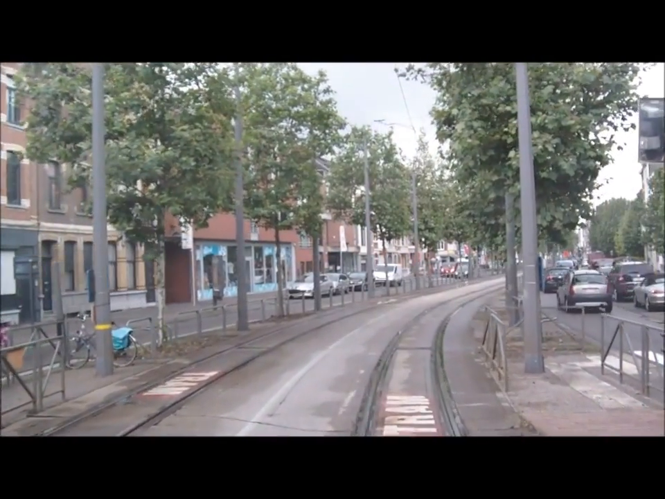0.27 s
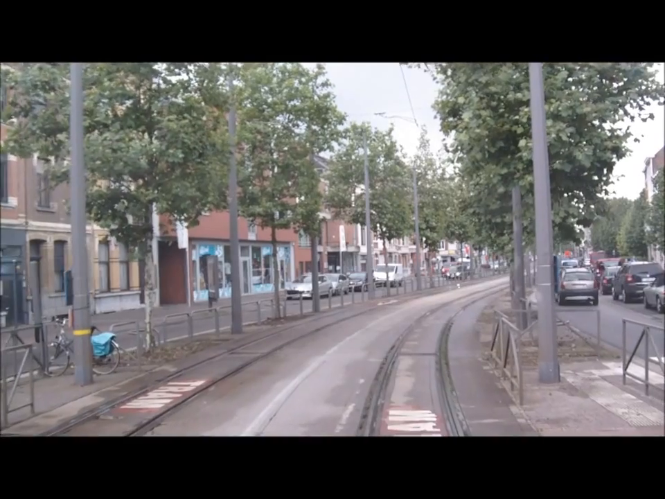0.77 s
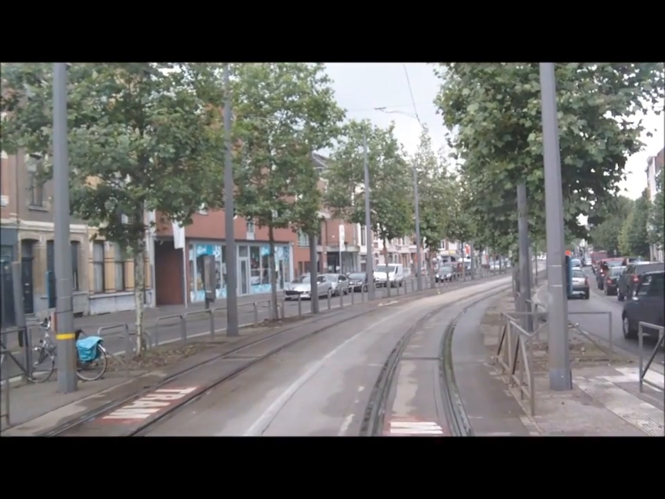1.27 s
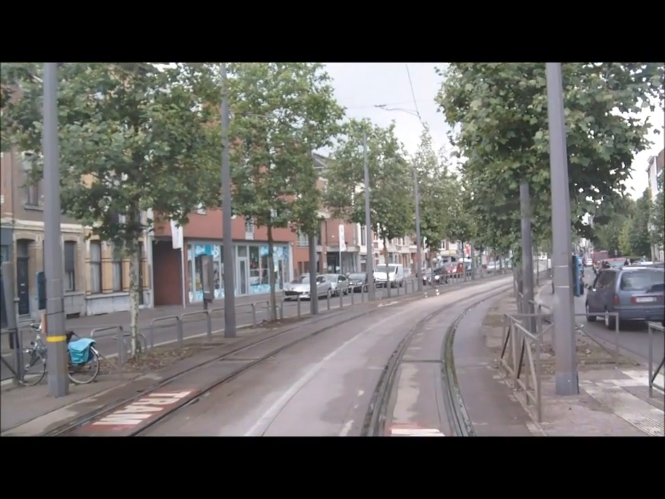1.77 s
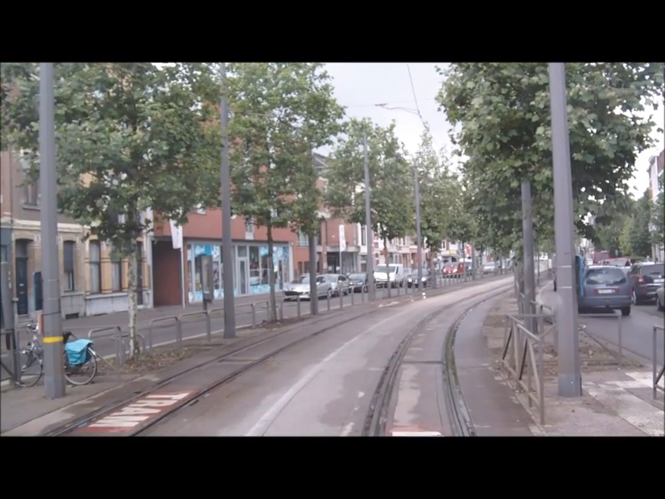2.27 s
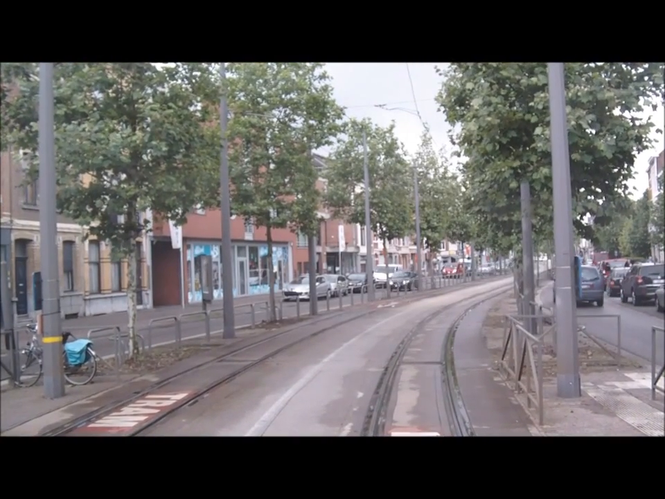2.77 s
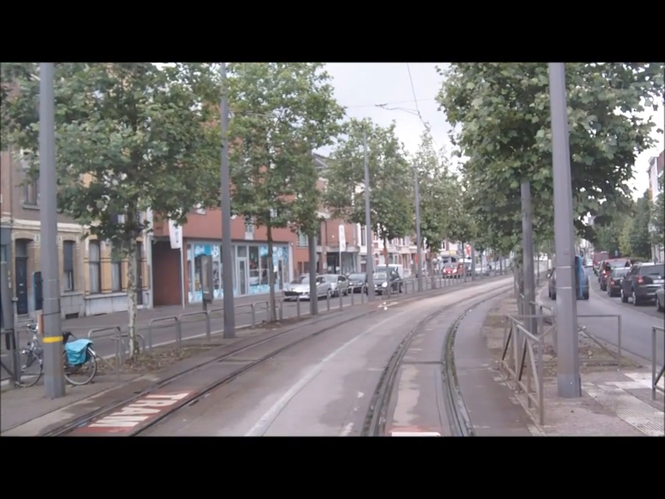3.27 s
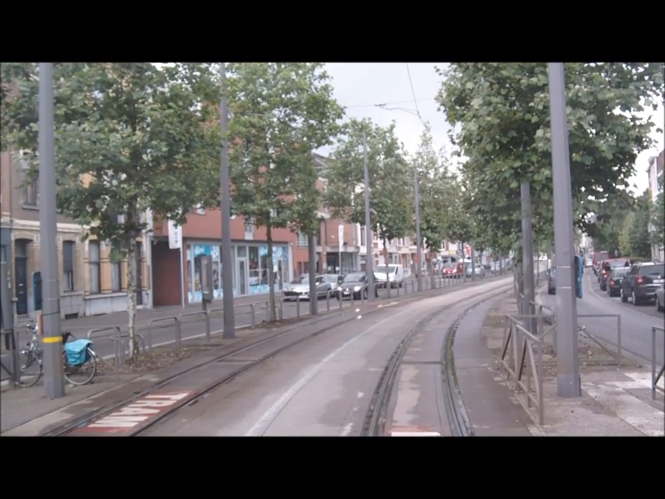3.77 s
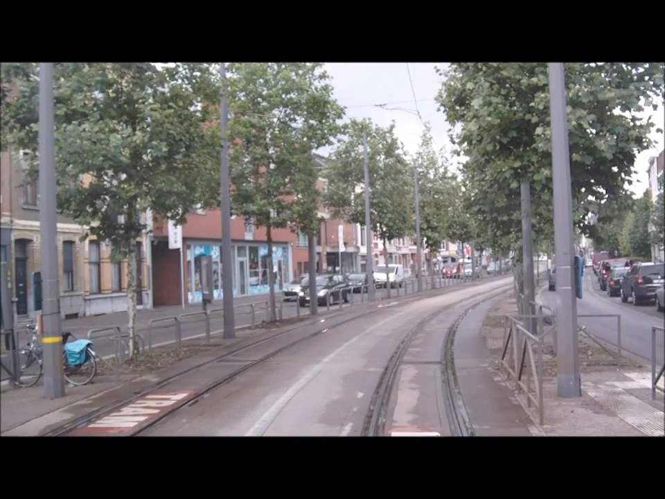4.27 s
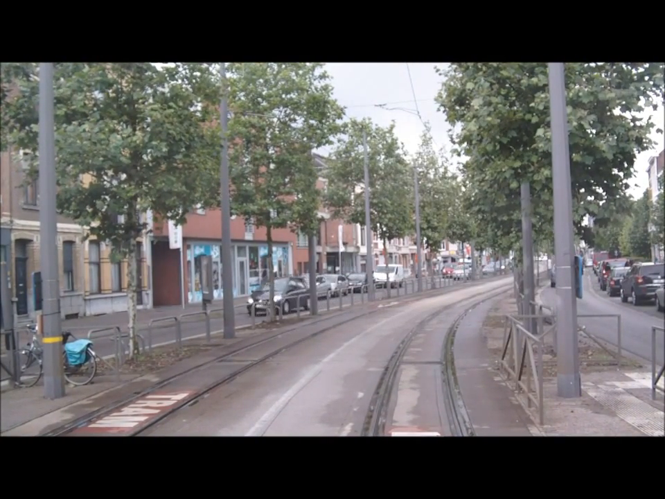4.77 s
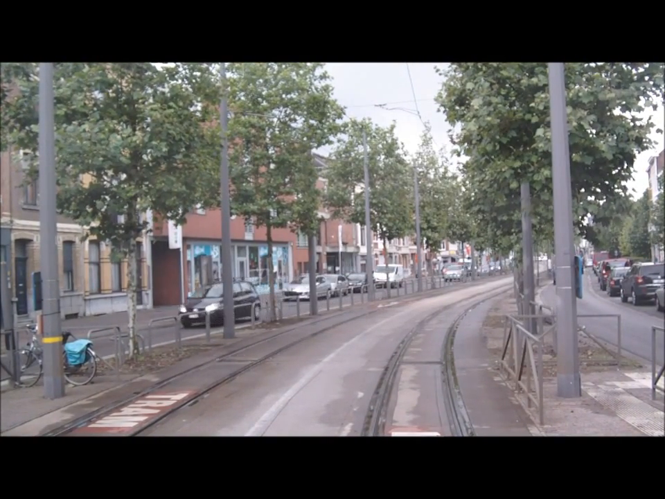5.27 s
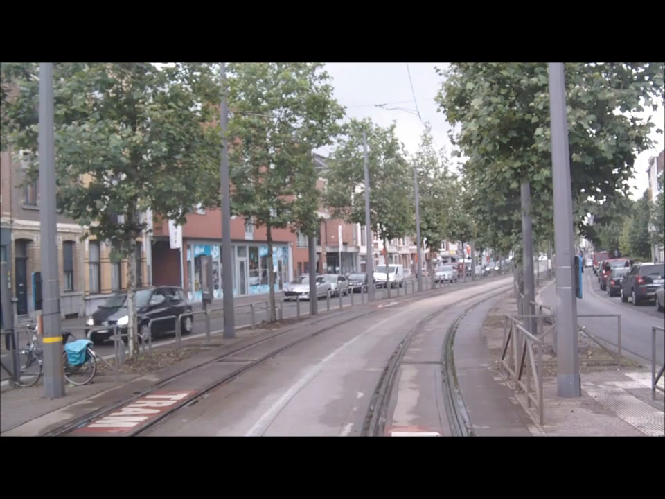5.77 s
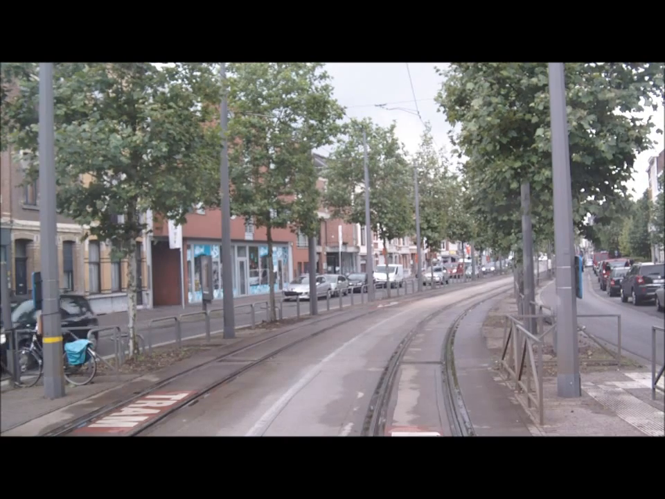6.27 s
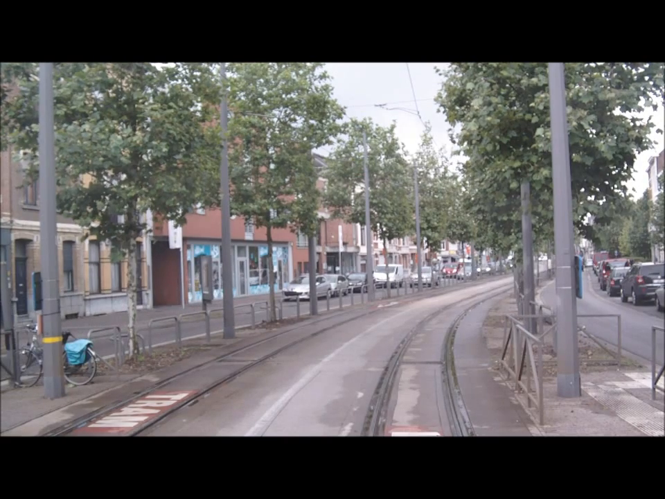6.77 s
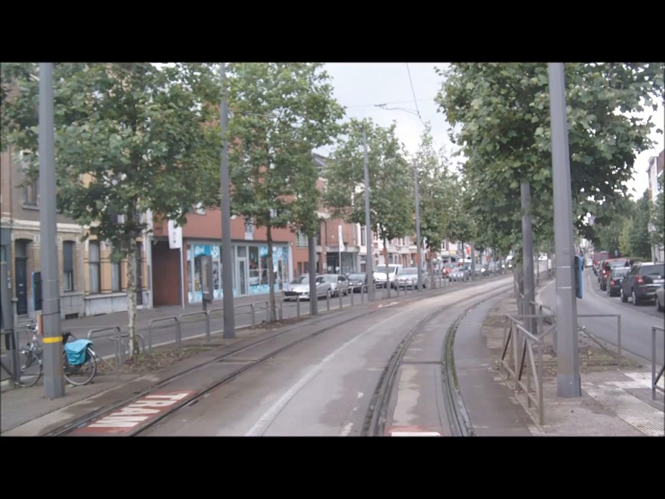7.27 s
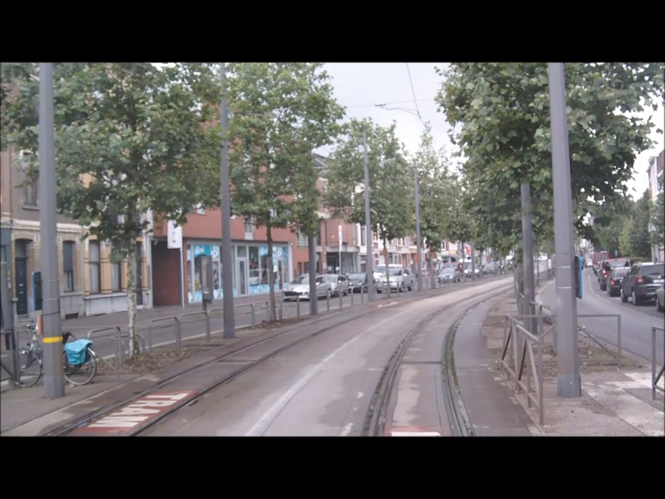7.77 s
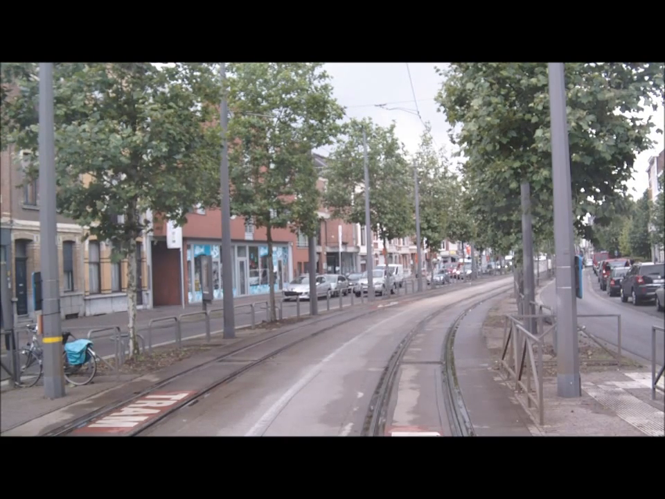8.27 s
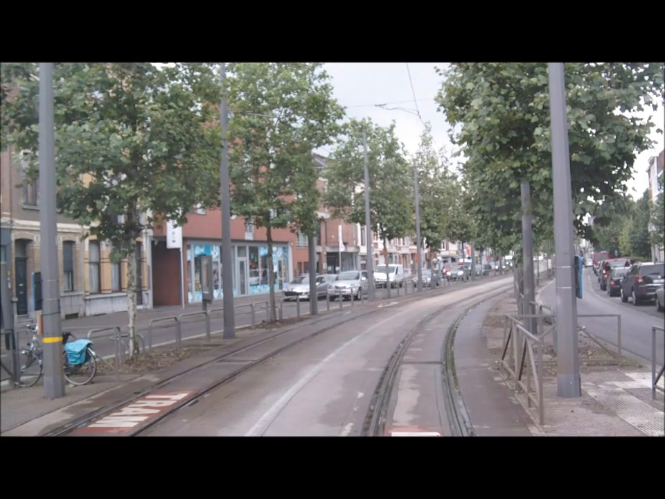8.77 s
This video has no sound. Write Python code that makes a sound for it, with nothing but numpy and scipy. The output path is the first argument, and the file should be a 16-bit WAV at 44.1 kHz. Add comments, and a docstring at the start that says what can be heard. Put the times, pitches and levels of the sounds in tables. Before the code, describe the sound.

Inside a tram cab, a motor whine sinks with a faint fluttering squeak, the body lurches and clacks, then low rumble and soft rustles remain.

```python
"""A braking tram, heard in the cab

The drive whines down beside a fluttering squeak, then the body lurches, levers clack and thin metal pings.
Whine, squeak, pings and hum are wavering sine tones; blows are quick taps that make the cab ring.
Rustles close by are short bursts of hiss. Body rumble, street, fans and wheel drone are coloured noise.
"""
import sys
import numpy as np
from scipy import signal
from scipy.fft import rfft, irfft, next_fast_len
from scipy.io import wavfile
from scipy.ndimage import uniform_filter1d, map_coordinates

SR = 44100
rng = np.random.default_rng(int(sys.argv[2]) if len(sys.argv) > 2 else 0)


def wrap_up_sound(samples):
    """Save the sound to the file named by the first command line argument, as 16-bit audio."""
    columns = np.atleast_2d(samples).T
    # keep every value between -1 and 1, then stretch to whole-number steps
    tamed = np.clip(columns, -1, 1)
    steps = np.round(tamed * 32767).astype(np.int16)
    wavfile.write(sys.argv[1], SR, steps)


N = 397341
TIME = np.arange(N) / SR  # s, the whole scene
SHORT = np.arange(SR // 2) / SR  # s, the half second given to each short sound


def amp(db):
    """Turns dB into a gain."""
    return 10 ** (np.asarray(db) / 20)


def unit(x):
    """Scales a signal to an rms of 1."""
    return x / np.sqrt(np.mean(x ** 2) + 1e-20)


def along(points, hz):
    """Reads a curve of (f/Hz, value) points on a log frequency axis."""
    f, value = np.transpose(points)
    return np.interp(np.log(hz + 1), np.log(f + 1), value)


def curves(rows):
    """Draws each column after the time as a curve with one value per sample."""
    times, *columns = np.transpose(rows)
    return [np.interp(TIME, times, column) for column in columns]


def wobble(rate):
    """A smooth random curve through `rate` random points a second."""
    points = rng.standard_normal(int(N * rate / SR) + 4)
    return map_coordinates(points, [np.arange(N) * rate / SR])


def wave(hz):
    """A sine whose pitch follows a curve: the phase is the running sum of the frequency."""
    return np.sin(2 * np.pi * np.cumsum(hz) / SR)


def filtered(x, response):
    """Multiplies the spectrum of x by a response of frequency."""
    m = next_fast_len(x.shape[-1] + 8192)
    spectrum = rfft(x, m) * response(np.fft.rfftfreq(m, 1 / SR))
    return irfft(spectrum, m)[..., :x.shape[-1]]


def rush(gain, patchy_db):
    """Two coloured noises, together of rms 1, whose patches in time and pitch have random gain."""
    grid = signal.stft(rng.standard_normal((2, N)), nperseg=512)[2]
    field = uniform_filter1d(rng.standard_normal(grid.shape[1:]), size=6, axis=0)
    field = uniform_filter1d(field, size=10, axis=1)
    pair = signal.istft(grid * amp(patchy_db * unit(field)), nperseg=512)[1][:, :N]
    return unit(filtered(pair, gain))


def swell(t, rise, hold, t60):
    """An outline that rises softly, holds, then falls by 60 dB every t60 seconds."""
    fall_time = np.clip(t - rise - hold, 0, None)
    return np.clip(t / rise, 0, 1) ** 2 * amp(-60 * fall_time / t60)


def add(total, start, sound):
    """Mixes a sound in at a start time in seconds."""
    part = total[:, round(start * SR):][:, :sound.shape[1]]
    part += sound[:, :part.shape[1]]


# the gear tone of the drive: first pitch, the pitch it sinks towards, time constant of sinking
WHINE_HZ, WHINE_END_HZ, SLOWING_S = 474, 286, 0.41
WHINE_DB, WHINE_FADE_DB_PER_S = -37.5, 7.5  # the level wavers around this fading line


def drive_whine():
    """The gear tone sinks with the speed, its pitch and level wavering."""
    hz = WHINE_END_HZ + (WHINE_HZ - WHINE_END_HZ) * np.exp(-TIME / SLOWING_S)
    db = WHINE_DB - WHINE_FADE_DB_PER_S * TIME + 1.8 * wobble(23)
    tone = amp(db) * wave(hz * (1 + 0.012 * wobble(32)))
    return swell(TIME, rise=.0012, hold=.546, t60=.14) * tone


SQUEAK_HZ, SQUEAK_DB = 1338, -51  # middle pitch and level
FLUTTERS_PER_S, FLUTTER_DB, FLUTTER_CREST_S = 12.1, 4.5, 0.062  # rate, depth, time of a crest


def wheel_squeak():
    """A squeak at the start flutters in level, with a band of raspy noise beside it."""
    flutter = np.cos(2 * np.pi * FLUTTERS_PER_S * (TIME - FLUTTER_CREST_S))
    db = SQUEAK_DB + FLUTTER_DB * flutter + 4.2 * wobble(60.4)
    squeak = amp(db) * wave(SQUEAK_HZ * (1 + 0.0215 * wobble(70)))
    rasp = amp(-59) * rush(lambda f: 1 / (1 + ((f - 2450) / 300) ** 2), patchy_db=3)
    return swell(TIME, rise=.001, hold=.4, t60=.66) * (squeak + rasp)


def lurch():
    """The brakes rock the body: a strong low tone that swells and soon dies away."""
    t = TIME - 2.191
    return amp(-9) * swell(t, rise=.028, hold=.025, t60=.05) * np.sin(2 * np.pi * 86 * t)


# what the cab's frame and panels ring with: f/Hz, level/dB (relative), time to fall 60 dB/s
CAB_MODES = [(41.6, -5, 0.25), (83.4, 6, 0.16), (112, 1.5, 0.37), (156.3, 3, 0.3), (213.7, -2, 0.72),
             (243.4, 0, 0.28), (344.6, -1.5, 0.33), (384, 2, 0.13), (422, 3, 0.16), (490.3, 1, 0.2),
             (637, -2, 0.18), (735, -2.5, 0.15), (830, -6.5, 0.11), (917, -5.5, 0.11), (1054, 3.5, 0.057),
             (1138, -14.5, 0.28), (1367, -5, 0.051), (1500, -5.5, 0.093), (1955, -5.5, 0.07),
             (2430, -9.5, 0.065), (3340, -8, 0.15), (3976, -2, 0.066), (4900, -9, 0.055), (5850, -5, 0.087),
             (6280, -3, 0.11)]
# blows: t/s, level/dB, f/Hz (centre of the push), spread/octaves,
# rattle/s (taps fall 60 dB in four times this), share of the power that rings (0-1)
BLOW_EVENTS = [(2.17, -23, 147, 0.74, 0.077, 0.65), (2.168, -34.5, 438, 0.21, .025, 0.8),
               (2.18, -29, 205, 0.3, .01, 1), (2.221, -34.5, 398, 0.85, 0.11, 0.82),
               (2.278, -21.5, 97, 0.45, 0.015, 0.7), (2.364, -21.5, 88, 0.28, 0.022, 0.7),
               (2.39, -37.5, 328, 0.55, 0.014, 0.9), (2.394, -21.5, 43.4, 0.25, 0.0063, .95),
               (2.623, -32.5, 744, 0.97, 0.06, 0.75), (2.622, -34, 5940, 0.22, 0.025, 0.34),
               (2.637, -26, 276, 0.32, 0.01, 0.55), (2.657, -22.5, 320, 0.53, 0.0066, 0.7),
               (2.68, -24.5, 148, 0.87, 0.013, 0.5), (2.879, -36, 1490, 0.59, 0.029, 0.7),
               (2.883, -32.5, 2390, .5, 0.013, .7), (2.877, -36, 4200, 0.68, 0.013, 0.4),
               (3.057, -16.5, 190, 0.9, 0.048, 0.64), (3.063, -22.5, 945, 0.46, 0.02, 0.72),
               (3.068, -34, 1930, 0.44, 0.015, 0.66), (3.088, -25.5, 365, 0.58, 0.021, .7),
               (3.112, -37, 1070, 0.25, 0.039, 1), (4.023, -45, 970, 0.39, 0.04, 0.8),
               (4.066, -41.5, 424, 0.32, 0.0099, 0.5), (5.272, -58, 3900, .15, .006, 0.7),
               (5.417, -49.5, 2640, 0.99, .01, 0.3), (5.904, -47, 1700, 0.78, 0.024, 0.68),
               (7.993, -31.5, 917, 0.83, 0.048, 0.64), (8.005, -31.5, 575, 0.26, 0.025, 0.46),
               (8.016, -40.5, 1790, 0.67, 0.043, 0.5)]
# average rate; level of the strong tap at the end of the rise, over the spread of the other taps
TAPS_PER_S, CREST_TAP_DB = 900, 8
SCATTER_T60_S = 0.21  # the many small modes die in this time


def blows():
    """Each blow rattles in quick taps and rings those cab modes that lie near its push."""
    out = np.zeros((2, N))
    hz, level_db, t60 = np.transpose(CAB_MODES)[:, :, None]
    turns = (-1) ** np.arange(len(CAB_MODES))[:, None]  # neighbouring modes swing opposite ways
    modes = turns * amp(level_db - 60 * SHORT / t60) * np.sin(2 * np.pi * hz * SHORT)

    def levelled(x):
        """Scales each channel to rms 1 over its first 60 ms."""
        return x / np.sqrt(np.mean(x[:, :round(.06 * SR)] ** 2, axis=1, keepdims=True))

    for start, db, push_hz, spread, rattle, share in BLOW_EVENTS:
        reach = lambda f: np.exp(-.5 * (np.log2((f + 1) / push_hz) / spread) ** 2)
        rise = 0.0038 + 0.82 / push_hz  # s; a low push is a soft one
        tap_here = rng.random((2, len(SHORT))) < TAPS_PER_S / SR
        taps = tap_here * rng.standard_normal((2, len(SHORT)))
        taps[:, round(rise * SR)] = amp(CREST_TAP_DB)
        rattling = taps * swell(SHORT, rise, 0, 4 * rattle)
        ring = signal.fftconvolve(rattling, reach(hz).T @ modes, axes=1)[:, :len(SHORT)]
        # noise stands for the many small modes
        scatter = filtered(rng.standard_normal((2, len(SHORT))), reach)
        scatter = scatter * swell(SHORT, rise, rattle, SCATTER_T60_S)
        mix = np.sqrt(share) * levelled(ring) + np.sqrt(1 - share) * levelled(scatter)
        add(out, start, amp(db) * mix)
    return out


# colour of rubbed cloth before each rub's tilt: f/Hz, level/dB (relative)
CLOTH_COLOUR = [(710, -13), (1200, -11.5), (1270, -16), (1500, -13.5), (1820, -11.5), (2150, -8.5),
                (2840, -14), (3090, -12), (5540, -11), (7460, -2.5), (9720, -8), (11300, -10),
                (15200, -24.5)]
# rustles: t/s, level/dB, tilt/dB per octave, length of the rub/s
RUSTLE_EVENTS = [(1.569, -48.5, 3, 0.14), (1.742, -39.5, -1, 0.079), (1.937, -33.5, 0, 0.1),
                 (2.22, -38, -4.5, 0.12), (2.591, -34.5, -3, 0.081), (2.874, -24.5, -4.5, 0.031),
                 (2.985, -43.5, -1, 0.08), (3.216, -41, 1.5, 0.062), (3.605, -51.5, 0, 0.095),
                 (4.016, -42.5, 1, 0.044), (4.418, -47, -3, 0.047), (4.575, -35, -2, 0.067),
                 (5.03, -46.5, -1.5, 0.019), (5.268, -36.5, -4, 0.049), (5.406, -30.5, -4.5, 0.024),
                 (5.645, -40, 2, 0.025), (5.705, -47.5, -1, 0.078), (5.895, -21.5, -6, 0.028),
                 (5.944, -37.5, 5, 0.02), (6.21, -52, 2, 0.058), (6.558, -46.5, -1.5, 0.053),
                 (6.809, -44.5, -1, 0.07), (8.01, -33, -2, 0.047)]
# a short rub catches at once; of any length beyond the sudden one, a share goes into the rise
RUB_CATCH_S, RUB_SUDDEN_S, RUB_SWELLS = 0.0037, 0.031, 0.51
RUB_T60_S, RUB_TRAILS = 0.19, 1.8  # basic fall time, and what each second of length adds to it


def rustles():
    """Each rub is a burst of grainy hiss, tilted to the low or high end; longer rubs trail off slower."""
    out = np.zeros((2, N))
    for start, db, tilt_db, length in RUSTLE_EVENTS:
        rise = RUB_CATCH_S + RUB_SWELLS * max(length - RUB_SUDDEN_S, 0)
        shape = swell(SHORT, rise, length - rise, RUB_T60_S + RUB_TRAILS * length)
        colour = lambda hz: amp(along(CLOTH_COLOUR, hz) + tilt_db * np.log2((hz + 1) / 6000))
        noise = unit(filtered(rng.standard_normal((2, len(SHORT))), colour))
        fibres = uniform_filter1d(rng.standard_normal(len(SHORT)), size=150)  # uneven slips a few ms long
        add(out, start, amp(db + 2 * unit(fibres)) * shape * noise)
    return out


# thin squeaks and pings of metal: t/s, f/Hz, level/dB (crest of the tone), length/s (scales hold and fall),
# unsteadiness/radians a sample
PING_EVENTS = [(2.335, 11730, -52, 0.19, 0.089), (3.56, 10850, -47.5, 0.073, 0.1),
               (5.406, 7950, -47, 0.022, .025), (5.456, 5350, -52, 0.076, 0.02),
               (5.445, 3155, -52, 0.089, 0.015), (5.866, 7870, -49.5, 0.12, 0.063),
               (6.621, 3000, -47, 0.041, 0.14)]
PING_RISE_S, PING_HOLDS, PING_TRAILS = 0.004, 0.46, 6.4  # rise; hold and 60 dB fall, per length


def pings():
    """Single thin tones, unsteady because their phase takes random steps."""
    out = np.zeros((2, N))
    for start, hz, db, length, unsteady in PING_EVENTS:
        drift = np.cumsum(rng.normal(0, unsteady, (2, len(SHORT))), axis=1)
        shape = swell(SHORT, PING_RISE_S, PING_HOLDS * length, PING_TRAILS * length)
        add(out, start, amp(db) * shape * np.sin(2 * np.pi * hz * SHORT + drift))
    return out


def wheel_drone():
    """The wheels drone as a band of noise around 460 Hz that holds, then slowly dies away."""
    drone = rush(lambda f: 1 / (1 + ((f - 460) / 90) ** 4), patchy_db=0.5)
    return amp(-48) * swell(TIME, rise=.001, hold=1.65, t60=2.4) * drone


# the low hum swells and fades: t/s, level/dB (rms, before its random waver)
HUM_LEVEL = [(.35, -58), (.6, -29), (1.05, -30), (1.3, -51), (1.9, -42), (2.9, -29.5), (3.3, -40),
             (4.3, -43.5), (4.6, -32), (5.1, -35.5), (5.5, -43), (6.2, -30.5), (6.45, -36.5), (7.1, -27.5),
             (7.5, -36), (7.9, -47), (8.25, -25), (8.5, -43), (9.01, -30)]


def low_hum():
    """A sine near 66 Hz that wavers in pitch and level."""
    level_db, = curves(HUM_LEVEL)
    hz = 66 + 3 * wobble(2) + 1.31 * wobble(11)
    return np.sqrt(2) * amp(level_db + 4.74 * wobble(14)) * wave(hz)


# colour of the rumble: f/Hz, level/dB (relative)
BODY_COLOUR = [(11, -55), (18, -7), (70, -5.5), (130, -10.5), (200, -10), (270, -15.5), (330, -23),
               (400, -27), (520, -28), (700, -51), (1500, -120)]


def body_rumble():
    """Low noise, as the car body passes it on, at rms 1."""
    return rush(lambda hz: amp(along(BODY_COLOUR, hz)), patchy_db=0.52)


# standing tones of the car body: f/Hz, width/Hz, level/dB (relative)
BODY_TONES = [(27.3, 12, -37.5), (38.74, 2.3, -34), (118.6, 16, -44.5), (158.9, 6, -41.5), (178.8, 20, -38),
              (210.9, 5.9, -41), (244.7, 7.1, -48.5), (315, 11.7, -51), (1028, 22, -63.5), (1143, 31, -60),
              (7660, 200, -63.5)]


def body_tones():
    """Fans and compressor keep the body's tones alive: narrow bands of noise that waver together."""
    def peaks(hz):
        return sum(amp(db) * np.sqrt(1 / width) / (1 + (2 * (hz - centre) / width) ** 2)
                   for centre, width, db in BODY_TONES)
    return amp(-31.5 + 3.6 * wobble(2.003)) * rush(peaks, patchy_db=0)


# colour of the street: f/Hz, level/dB (relative)
STREET_COLOUR = [(260, -12.5), (450, 2), (577, -11.5), (624, -1), (685, -4.5), (1035, 2), (1240, -4),
                 (1650, -6.5), (2030, -7), (2820, -15.5), (3500, -19.5), (4550, -30), (7700, -120)]


def street_tyres():
    """Tyres on the street: patchy noise, mostly in the middle pitches, at rms 1."""
    return rush(lambda hz: amp(along(STREET_COLOUR, hz)), patchy_db=1.6)


# colour of the fan hiss: f/Hz, level/dB (relative)
HISS_COLOUR = [(1470, -22), (2500, -6), (2860, -11), (3110, -6.5), (3590, -7), (4710, -6), (5690, -7.5),
               (7410, -2), (8890, -5.5), (11100, -8), (12400, -15), (14400, -17), (15200, -23)]


def fan_hiss(street_db):
    """High fan noise around -54 dB that the street adds to, so it follows the street level in part."""
    hiss = rush(lambda hz: amp(along(HISS_COLOUR, hz)), patchy_db=0.5)
    return amp(-54 + 0.47 * (street_db - street_db.mean()) + 0.28 * wobble(1.0)) * hiss


# background levels: t/s, car body rumble level/dB, street level/dB (before its slight waver)
BED_LEVELS = [(0, -30, -43), (.7, -30.5, -46), (1.9, -31, -46.5), (2.6, -27.5, -47.5), (3.2, -28.5, -44.5),
              (3.6, -32.5, -48.5), (6.3, -33, -46), (7.0, -31, -44), (7.8, -33, -43), (8.2, -30, -42.5),
              (8.6, -32, -38.5), (9.01, -34, -36)]


def bed():
    """The steady background: hum, body rumble and tones, street and fan hiss."""
    body_db, street_db = curves(BED_LEVELS)
    rumble = amp(body_db) * body_rumble()
    street = amp(street_db + .6 * wobble(3)) * street_tyres()
    return low_hum() + rumble + body_tones() + street + fan_hiss(street_db)


def standing_waves(x, depth_db, width_hz):
    """The closed cab lifts some narrow bands and swallows others, more so towards the treble."""
    knots = rng.standard_normal(int(SR / 2 / width_hz) + 4)
    ripple = lambda hz: map_coordinates(knots, [hz / width_hz]) * hz / (hz + 500)
    return filtered(x, lambda hz: amp(depth_db * ripple(hz)))


# how alike left and right are: f/Hz, likeness (1 = the same, 0 = unrelated)
LIKENESS = [(180, .997), (350, .975), (630, .95), (1390, .82), (3060, .38), (6700, .05), (9000, .15),
            (14700, .15)]


def widened(pair):
    """Mixes two signals to left and right, alike in the bass and nearly unrelated in the treble."""
    turn = lambda hz: np.arccos(along(LIKENESS, hz)) / 2
    mid, side = filtered(pair, lambda hz: np.array([np.cos(turn(hz)), np.sin(turn(hz))]))
    return np.array([mid + side, mid - side])


def scene():
    """All sources reach left and right through the cab's diffuse field."""
    driving = drive_whine() + wheel_squeak() + lurch() + wheel_drone()
    handling = blows() + rustles() + pings()
    background = standing_waves(bed(), depth_db=1.42, width_hz=35)
    return widened(driving + handling + background)


# the two microphone ports differ in colour: f/Hz, left over right level/dB
PORT_COLOUR = [(1000, .5), (1550, -3), (2600, -5), (3600, -3), (5200, -5.5), (7250, -14.5), (8800, -2.5),
               (11350, 12.5), (13500, 3.5), (15000, 1)]
TOP_HZ = 15320  # band limit


def record(dry):
    """Each port has its own treble colour; nothing stays above the band limit."""
    def ports(hz):
        left_over_right_db = along([(500, 0)] + PORT_COLOUR, hz)
        return amp(left_over_right_db * [[.5], [-.5]]) * (hz < TOP_HZ)
    return filtered(dry, ports)


dry = scene()
out = record(dry)
wrap_up_sound(out)
```